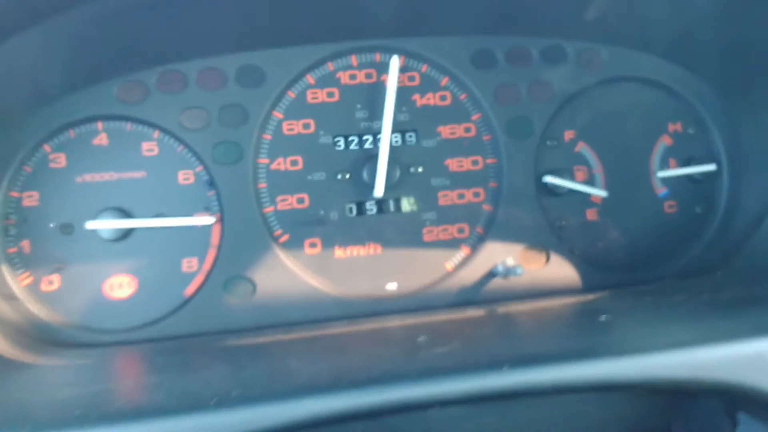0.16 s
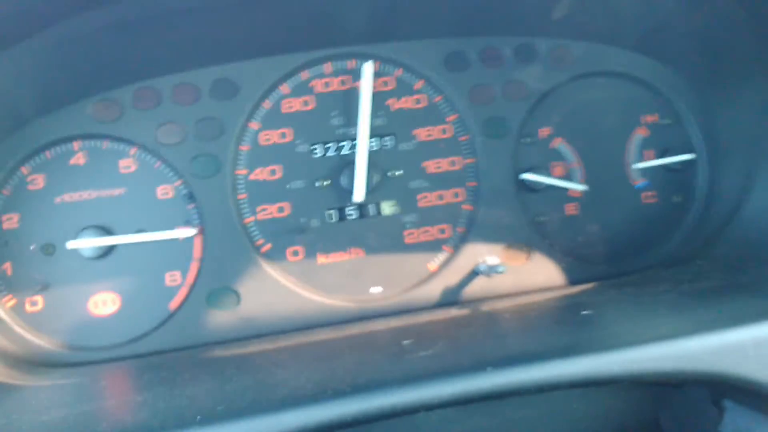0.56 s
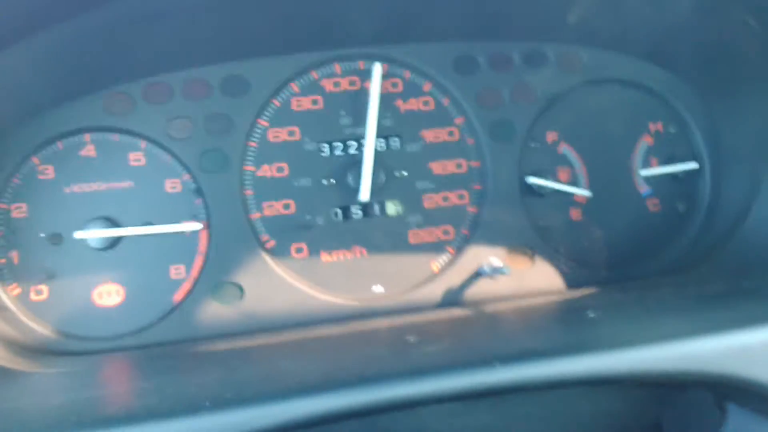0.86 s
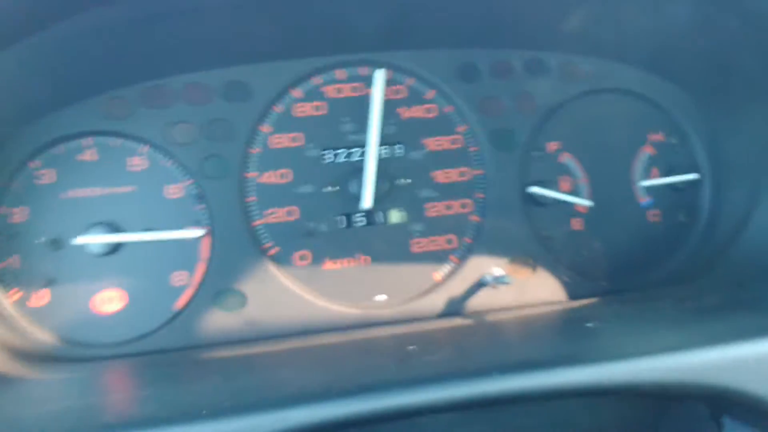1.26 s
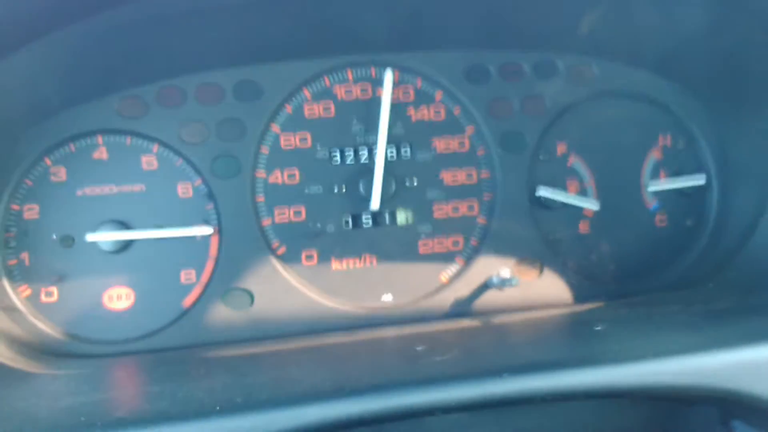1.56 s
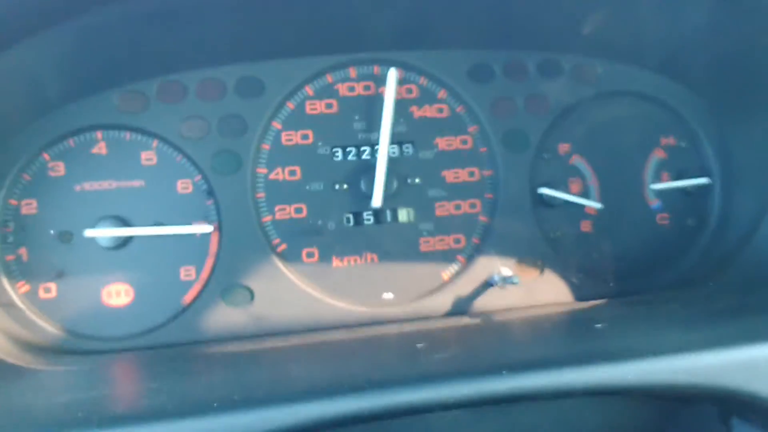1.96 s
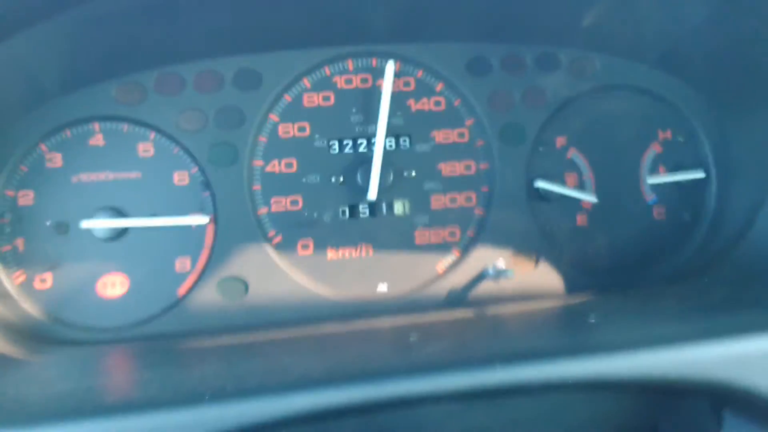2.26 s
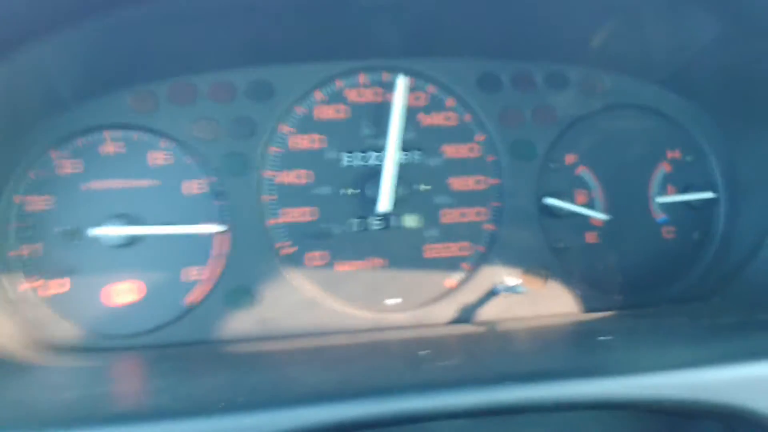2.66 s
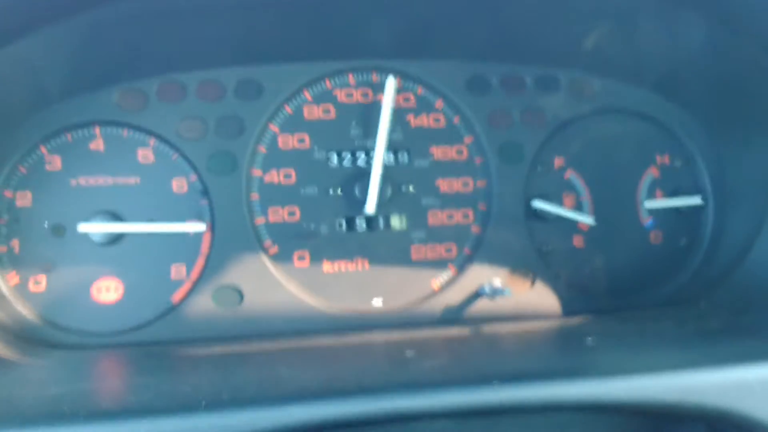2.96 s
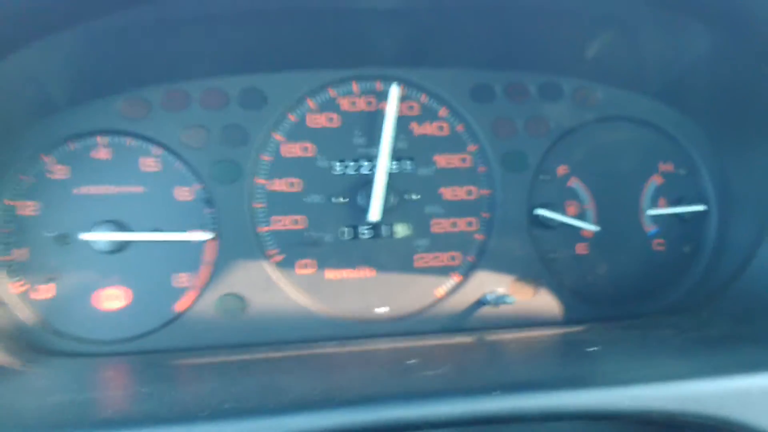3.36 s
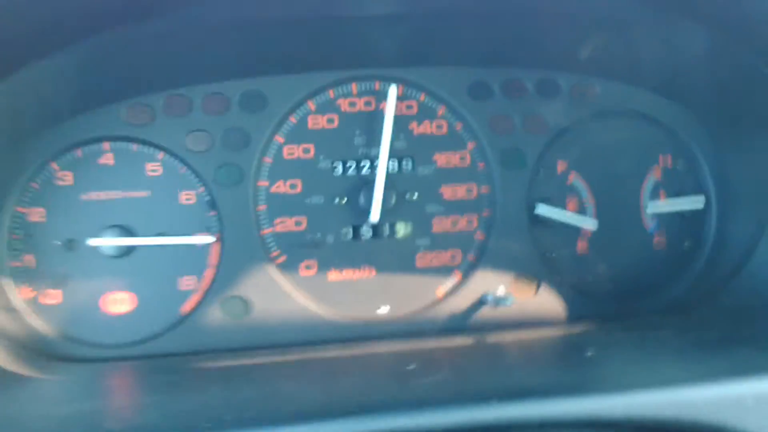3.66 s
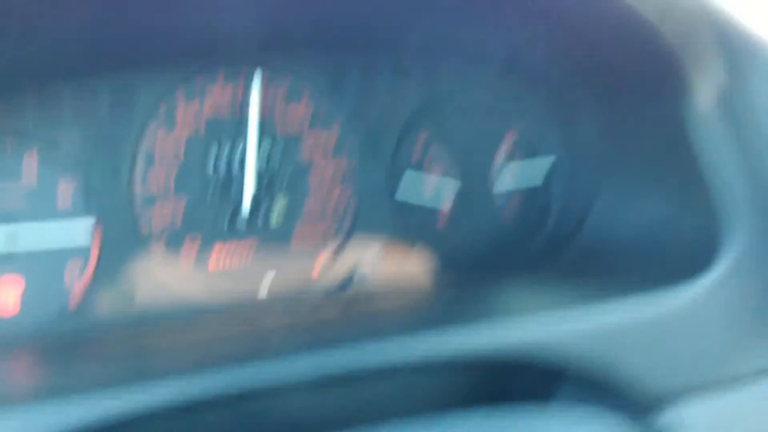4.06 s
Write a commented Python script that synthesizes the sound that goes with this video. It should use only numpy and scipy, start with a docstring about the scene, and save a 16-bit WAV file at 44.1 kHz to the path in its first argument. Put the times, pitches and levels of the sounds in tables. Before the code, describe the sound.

A four-cylinder car engine is held at its rev limiter, heard from inside the cabin at speed. About six times a second it cuts out and catches again, making a fast, barking stutter with small thumps and a slight dip in pitch. The open intake snarls and sputters after each cut. Mechanical clatter, a faint thin whistle and steady road roar run underneath, unchanged to the end.

```python
"""A four-cylinder engine with an open intake bounces off its rev limiter, heard from the cabin at speed.
Six times a second the fuel is cut: the firing note thumps, the exhaust falters and the revs sag.
The intake then snarls and sputters. The fuel returns with a second thump, the revs climb and a thin
whistle swells. Throughout, low orders (multiples of the crank speed) bark as they sweep across the
pipe resonances, over engine-bay and road noise."""
import sys
import numpy as np
from scipy import signal
from scipy.fft import rfft, irfft, next_fast_len
from scipy.io import wavfile
from scipy.ndimage import uniform_filter1d, minimum_filter1d

SR = 44100
rng = np.random.default_rng(int(sys.argv[2]) if len(sys.argv) > 2 else 0)


def digitize_waveform(pressure):
    """Quantize a signal to 16-bit integers and store it at the path in sys.argv[1].

    Rows of a 2-D input are taken as channels; values are limited to [-1, 1].
    """
    field = np.atleast_2d(pressure).T
    bounded = np.clip(field, -1, 1)
    quanta = np.round(bounded * 32767).astype(np.int16)
    wavfile.write(sys.argv[1], SR, quanta)


N = 185967
COAST_SHARE = .57  # part of each bounce with the fuel off


def bark(bounce, crank_hz, turns, rough=0.11, flutter_db=-44.5):
    """Low intake and exhaust orders bark as the revs carry them across pipe resonances."""
    # Steady orders. Each row: order, level in dB.
    drone = [(1, -40), (1.5, -47), (2, -34), (3, -28), (3.5, -38), (4, -36), (4.5, -36), (5, -37),
             (5.5, -32.5), (6, -42), (7, -37), (8, -35.5), (10, -33.5), (12, -46), (14, -49), (16, -43)]
    # Resonances. Each row: order, centre in Hz, half width in Hz, coasting dB, pulling dB.
    pipes = [(2.5, 290, 9, -29, -29), (3.5, 388, 16, -40, -29), (4, 440, 21, -12.7, -13.6),
             (6, 670, 17, -18.2, -24.5), (7, 774, 12, -36, -26), (7, 812, 10, -32, -31),
             (8, 898, 9, -45, -30), (8, 915.5, 15, -16.2, -23), (10, 1122, 10, -22.6, -40),
             (10, 1160, 12, -30, -35), (12, 1355, 12, -26.5, -30), (12, 1392, 11, -28, -33),
             (14, 1620, 18, -31, -46), (16, 1798, 18, -31.5, -50), (16, 1852, 24, -27, -34),
             (17, 1918, 20, -27, -48), (17, 1972, 22, -29.5, -32)]
    coast = coasting(bounce)
    falter = amp(-7 * swell(bounce, place=.16, width=.13))
    levels = {order: amp(db) for order, db in drone}
    for order, hz, width_hz, coast_db, pull_db in pipes:
        in_tune = np.exp(-((order * crank_hz - hz) / width_hz) ** 2)
        peak = coast * amp(coast_db) + (1 - coast) * amp(pull_db)
        levels[order] = levels.get(order, 0) + in_tune * peak
    out = np.zeros(N)
    for order, level in levels.items():
        if 3.5 <= order <= 5.5:  # exhaust orders
            level = level * falter
        # no two firings are alike: size and timing shake
        shake = (rough * level + amp(flutter_db)) * (wander(34) + 1j * wander(38))
        out += ((level + shake) * np.exp(2j * np.pi * (order * turns + rng.random()))).real
    return np.sqrt(2) * out


def boom(bounce, turns):
    """The firing note, order 2, thumps and droops when the fuel stops and again when it returns."""
    coast = amp(-19.2) * swell(bounce, place=0.46, width=0.18)
    pull = amp(-16.4) * swell(bounce, place=0.9, width=.15)
    fuel_cut = amp(-16) * swell(bounce, place=0.115, width=0.095, release=.45)
    fuel_back = amp(-19.7) * swell(bounce, place=0.634, width=0.052)
    thumps = (fuel_cut + fuel_back) * amp(1.2 * wander(4))
    # exhaust pulses slip out of step at each change of load
    droop_hz = 54 * swell(bounce, place=0.13, width=.08) + 29 * swell(bounce, place=0.623, width=.06)
    cycles = 2 * turns - np.cumsum(droop_hz * amp(0.91 * wander(2.87))) / SR
    level = (coast + pull + thumps) * amp(0.35 * wander(47))
    return np.sqrt(2) * level * np.sin(2 * np.pi * cycles)


def intake(bounce, turns):
    """After each cut the open intake snarls; air sputters through it a moment later."""
    # Snarl envelope. Each row: frequency in Hz, level of an order there in dB.
    snarl_spectrum = [(1300, -68), (1600, -41), (1950, -43), (2150, -44), (2380, -39), (2460, -46),
                      (2560, -37), (2720, -32.5), (2950, -40), (3090, -34.5), (3330, -51), (4000, -52.5),
                      (4500, -59.5), (5350, -53), (7000, -62)]
    # Air noise. Each row: frequency in Hz, relative density in dB.
    hiss_spectrum = [(1500, -12), (2900, 7), (4000, 3.5), (4600, -2), (5400, 2), (6200, -1), (7000, -5.5),
                     (8500, -6.5), (11000, -14.2), (13500, -21), (14200, -22), (15700, -31)]
    snarl = upper_orders(turns, snarl_spectrum, half_order_db=-17, rough=.2)
    air = rng.standard_normal(N) * amp(2.1 * wander(170)) * swell(bounce, place=0.39, width=0.34)
    hiss = coloured(cabin(air, t60_s=0.096, wet_db=-3), hiss_spectrum)
    return snarl * swell(bounce, place=0.33, width=0.25) + amp(-38) * hiss


def engine_bay(bounce, turns):
    """Valve gear clatters in pulsing mechanical noise; both ease late in the coast."""
    # Valve gear and block. Each row: frequency in Hz, level of an order there in dB.
    clatter_spectrum = [(1200, -49), (1400, -46), (1800, -52), (2200, -44), (2400, -45), (3000, -51.5),
                        (3900, -55), (4500, -61), (6050, -65), (6600, -84)]
    # Mechanical noise. Each row: frequency in Hz, relative density in dB.
    noise_spectrum = [(300, -38), (800, 1.5), (1400, 4), (2000, -3.5), (2800, -6), (3900, -9),
                      (4500, -22.5), (6100, -36), (7000, -32.5), (10800, -33), (13000, -43), (15700, -56)]
    noise = coloured(cabin(valve_puffs(turns), t60_s=0.15, wet_db=-4), noise_spectrum)
    clatter = upper_orders(turns, clatter_spectrum, half_order_db=-9, rough=0.63)
    load = amp(-2.5 * swell(bounce, place=0.5, width=0.087))
    return load * (clatter + amp(-26) * noise)


def valve_puffs(turns, depth=0.7, decay_share=0.15, uneven_db=5.2):
    """Noise puffs at each valve opening, two a turn, alternately strong and weak."""
    puff = np.exp(-(2 * turns % 1) / decay_share)
    accent = 1 + 1.5 * (turns % 1 < .5)
    gate = 1 + depth * puff * accent * amp(uneven_db * wander(110))
    return gate * rng.standard_normal(N)


def whistle(bounce, hz=6090, width_hz=60):
    """A thin narrow-band whistle from the engine bay, strongest as the revs climb."""
    carrier = np.exp(2j * np.pi * hz * np.arange(N) / SR)
    level = amp(-51.5 + 2 * wander(3)) * (.3 + .7 * swell(bounce, place=.85, width=.17))
    return level * (carrier * (wander(width_hz) + 1j * wander(width_hz))).real


def road(level_db=-24):
    """Steady road roar in the cabin."""
    # Each row: frequency in Hz, relative density in dB.
    roar_spectrum = [(20, -19), (48, -30), (65, -23), (80, -24), (100, -10.5), (170, 5), (280, -8),
                     (550, -0.5), (800, -2), (1100, -3), (2000, -31), (4000, -50)]
    return amp(level_db) * coloured(rng.standard_normal(N), roar_spectrum)


def upper_orders(turns, spectrum, half_order_db, rough):
    """Orders 11 to 61.5; unequal cylinders add weaker lines between the whole orders."""
    mean_crank_hz = turns[-1] * SR / N
    shakes = [1 + rough * (wander(25) + 1j * wander(17)) for _ in range(7)]
    out = np.zeros(N)
    for halves in range(22, 124):
        order = halves / 2
        level = amp(db_at(spectrum, order * mean_crank_hz) + half_order_db * (halves % 2))
        line = np.exp(2j * np.pi * (order * turns + rng.random()))
        out += (level * line * shakes[halves % len(shakes)]).real
    return np.sqrt(2) * out


def cabin(x, t60_s, wet_db):
    """Adds dense early reflections from glass and trim; rms 1."""
    t = np.arange(4096) / SR
    taps = rng.standard_normal(len(t)) * amp(-60 * t / t60_s)
    return unit(x + amp(wet_db) * signal.oaconvolve(x, taps / np.linalg.norm(taps))[:N])


def coasting(bounce, lag_share=.012, edge_share=.04):
    """Near 1 with the fuel off, near 0 while the engine pulls."""
    from_middle = abs((bounce - lag_share - COAST_SHARE / 2 + .5) % 1 - .5)
    return 1 / (1 + np.exp((from_middle - COAST_SHARE / 2) / edge_share))


def swell(bounce, place, width, release=1):
    """One bell curve per bounce; place and width in bounces, release as fall time over rise time."""
    since = (bounce - place + .5) % 1 - .5
    return np.exp(-(since / np.where(since < 0, width, width * release)) ** 2)


def wander(rate_hz):
    """Random motion of rms 1, up to about rate_hz."""
    count = N // 32
    hz = np.fft.rfftfreq(count, N / count / SR)
    slow = irfft(rfft(rng.standard_normal(count)) * np.exp(-.5 * (hz / rate_hz) ** 2), count)
    return np.interp(np.arange(N), np.linspace(0, N, count), unit(slow))


def coloured(x, spectrum):
    """Filters x by a spectrum; rms 1."""
    size = next_fast_len(N)
    gain = amp(db_at(spectrum, np.fft.rfftfreq(size, 1 / SR)))
    return unit(irfft(rfft(x, size) * gain, size)[:N])


def db_at(spectrum, hz):
    """Interpolates a spectrum over log frequency."""
    points_hz, db = np.transpose(spectrum)
    return np.interp(np.log(hz + 1), np.log(points_hz), db)


def amp(db):
    """Decibels to gain."""
    return 10 ** (np.asarray(db) / 20)


def unit(x):
    """Scales to rms 1."""
    return x / np.sqrt(np.mean(x ** 2) + 1e-20)


def scene(limit_hz=116.4, resume_hz=110.3):
    """The rev limiter's cycle sets the crank speed; the crank drives the engine's orders."""
    # Fuel cuts. Each entry: start of a bounce in seconds.
    cuts_s = [-0.036, 0.13, 0.287, 0.46, 0.629, 0.8, 0.958, 1.116, 1.275, 1.439, 1.608, 1.761, 1.938, 2.099,
              2.259, 2.434, 2.608, 2.767, 2.923, 3.075, 3.229, 3.375, 3.534, 3.685, 3.845, 4.004, 4.16,
              4.33]
    # bounce count; its fraction is the place within the present bounce
    bounce = np.interp(np.arange(N) / SR, cuts_s, np.arange(len(cuts_s)))
    crank_hz = np.interp(bounce, [0, COAST_SHARE], [limit_hz, resume_hz], period=1) + 0.18 * wander(32.2)
    turns = np.cumsum(crank_hz) / SR
    roar = road()
    engine = bark(bounce, crank_hz, turns) + boom(bounce, turns) + intake(bounce, turns)
    return (engine + engine_bay(bounce, turns) + whistle(bounce) + roar)[None]


def record(dry, ceiling=.72, cutoff_hz=15750):
    """Fast peak limiter with smoothed gain, then a low-pass."""
    headroom = np.minimum(1, ceiling / (abs(dry) + 1e-9))
    gain = minimum_filter1d(headroom, size=121)
    gain = uniform_filter1d(uniform_filter1d(gain, size=61), size=61)
    lowpass = signal.firwin(1023, cutoff_hz, window=("kaiser", 9), fs=SR)
    return signal.oaconvolve(dry * gain, lowpass[None], "same")


dry = scene()
out = record(dry)
digitize_waveform(out)
```